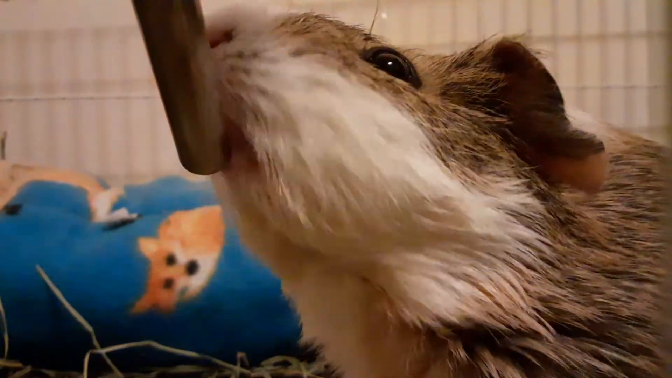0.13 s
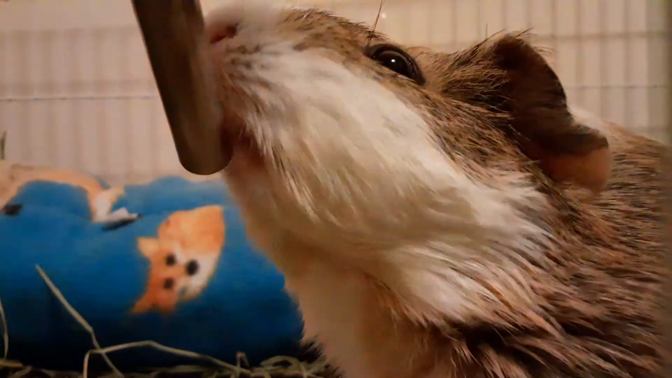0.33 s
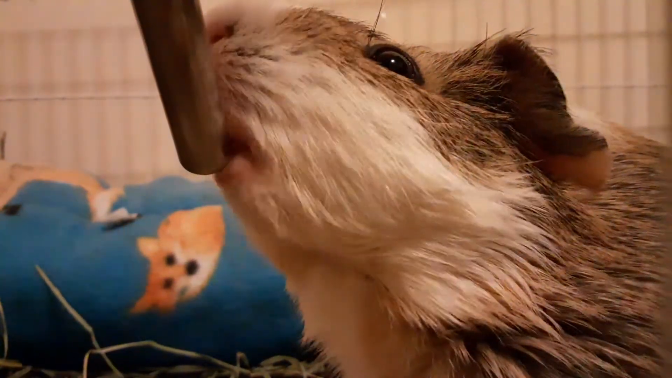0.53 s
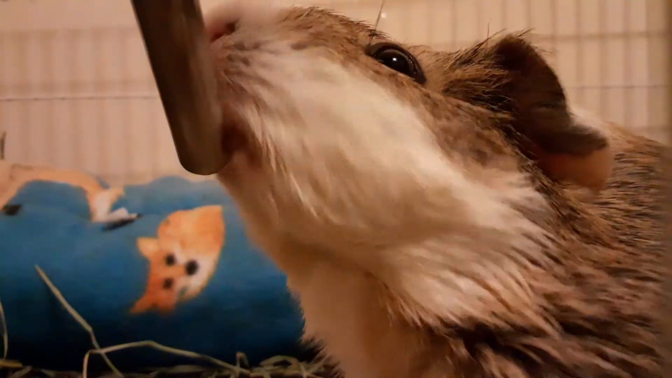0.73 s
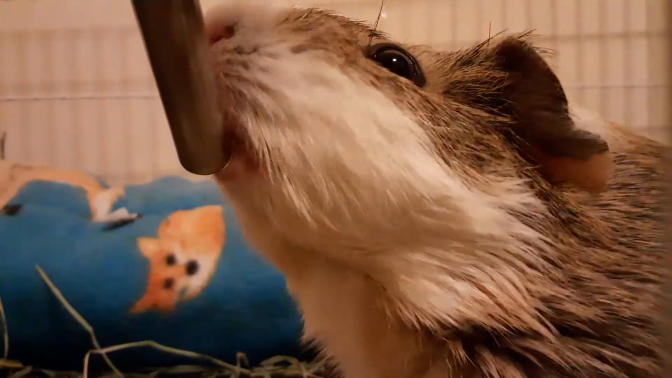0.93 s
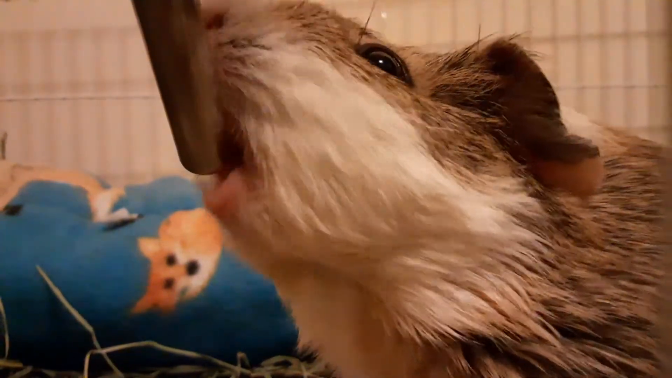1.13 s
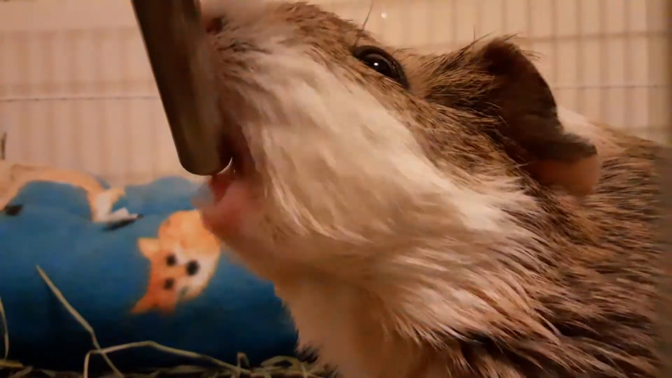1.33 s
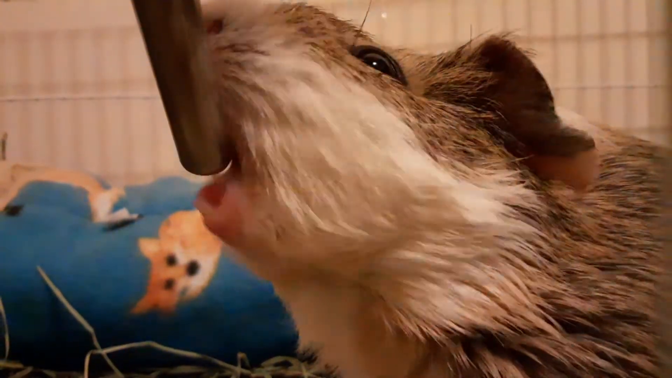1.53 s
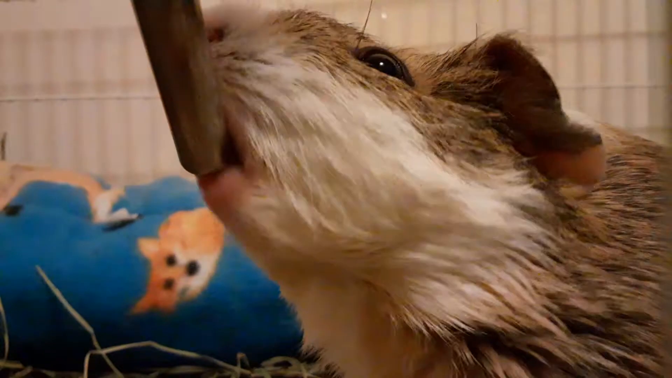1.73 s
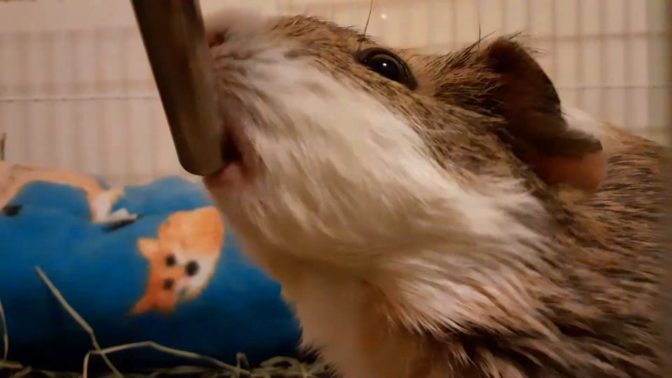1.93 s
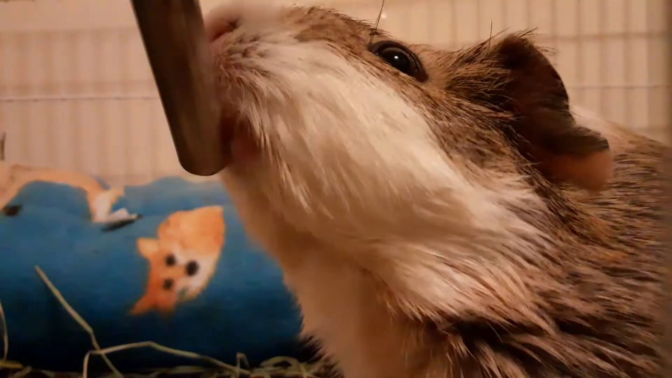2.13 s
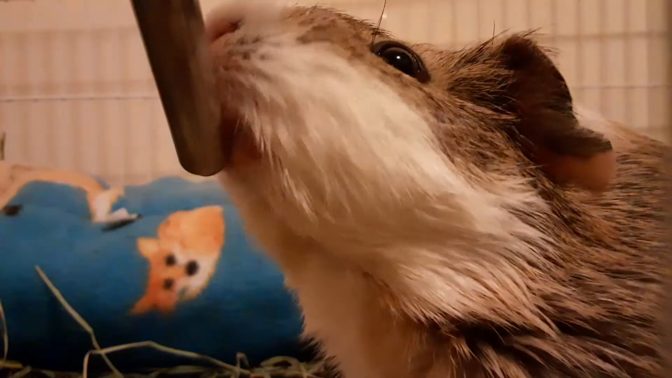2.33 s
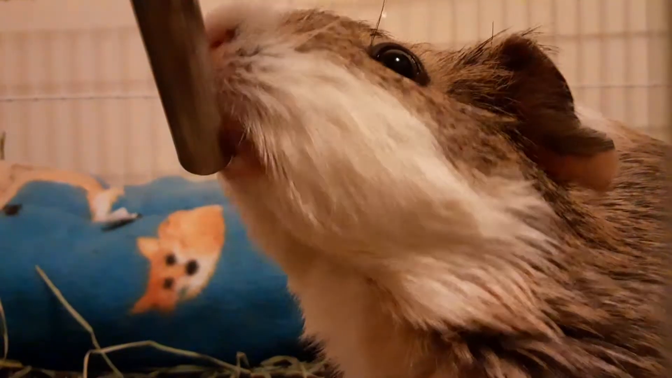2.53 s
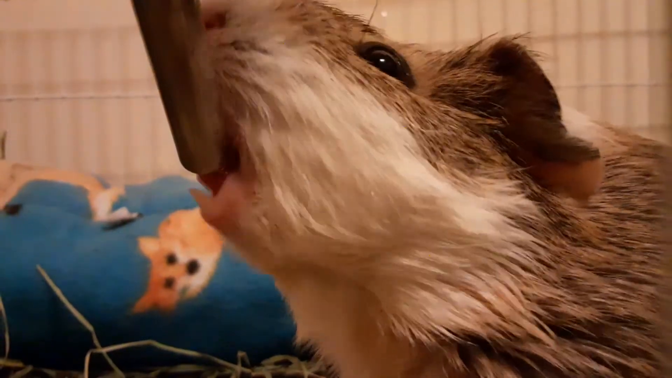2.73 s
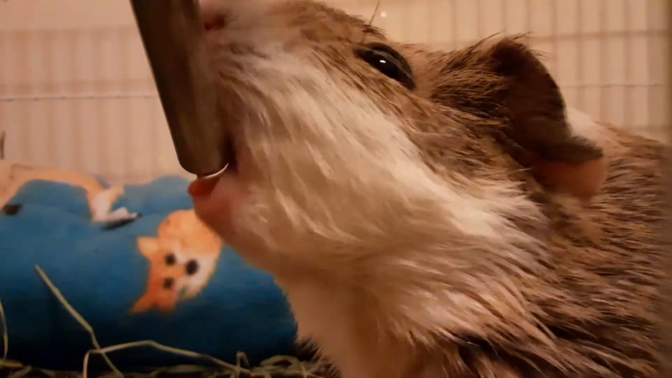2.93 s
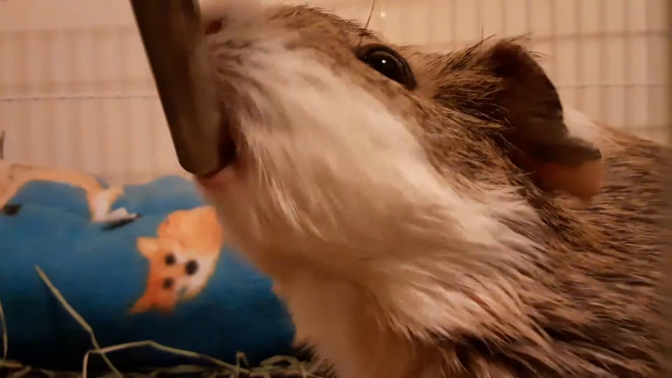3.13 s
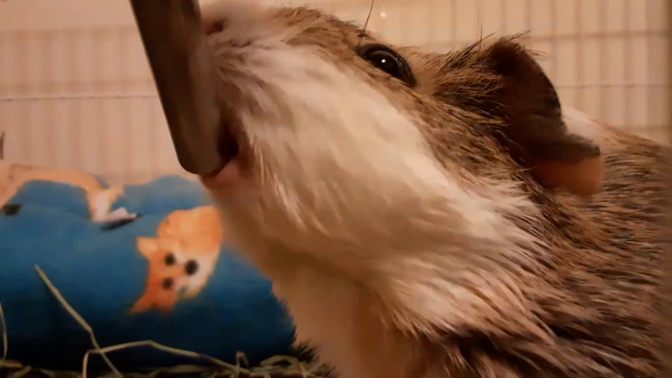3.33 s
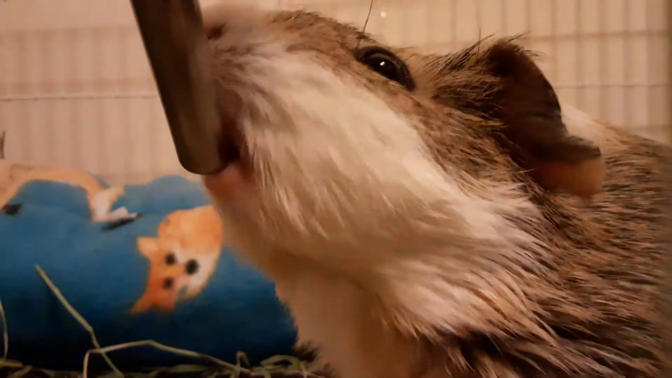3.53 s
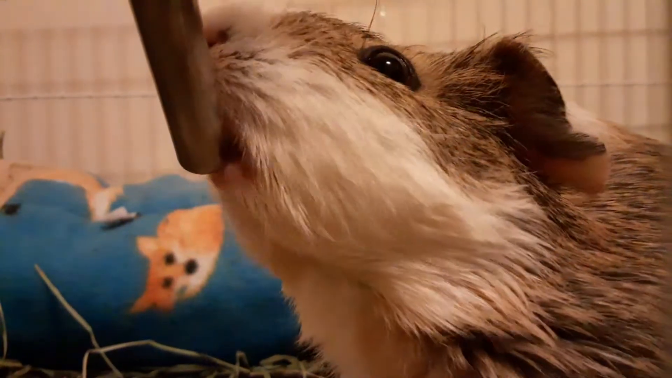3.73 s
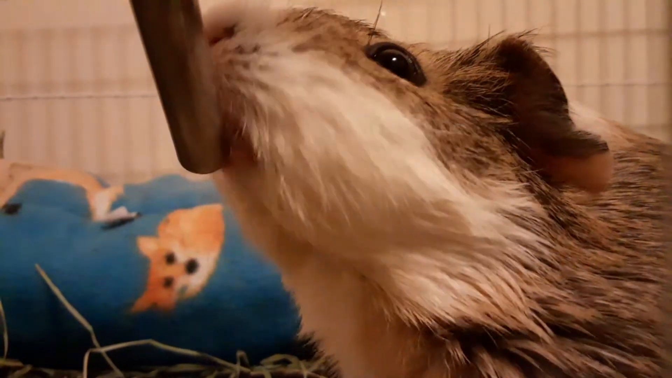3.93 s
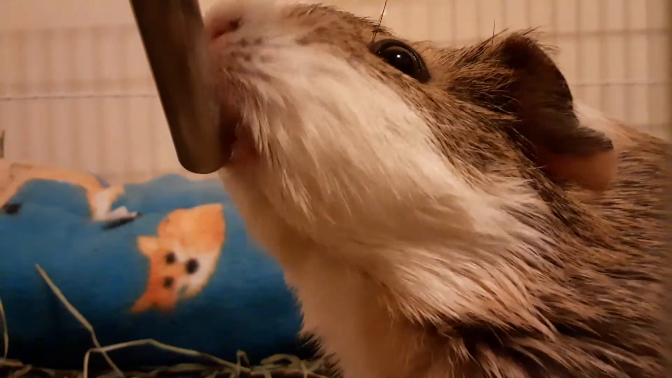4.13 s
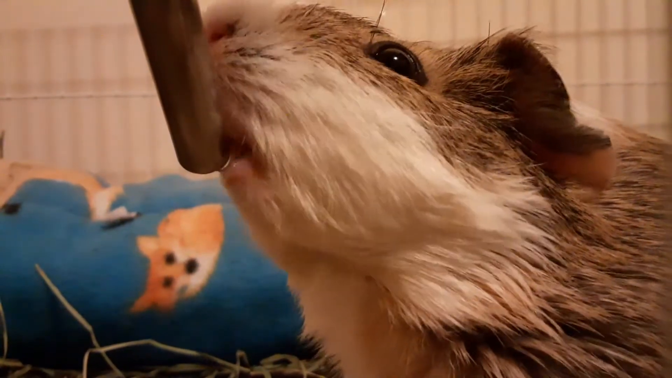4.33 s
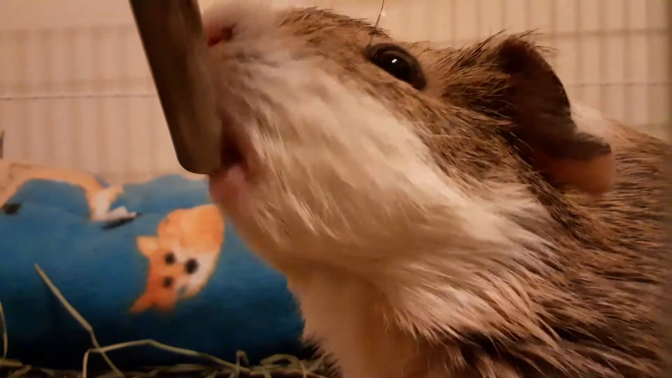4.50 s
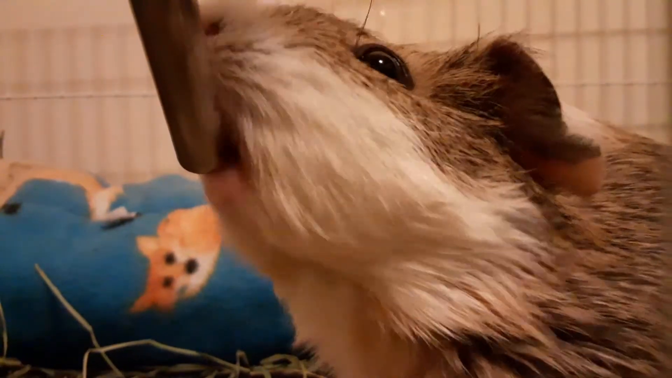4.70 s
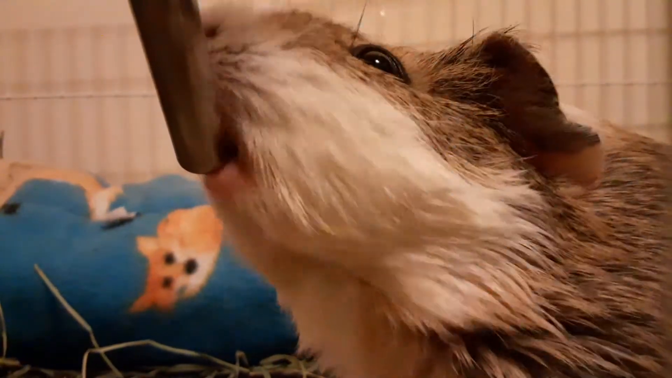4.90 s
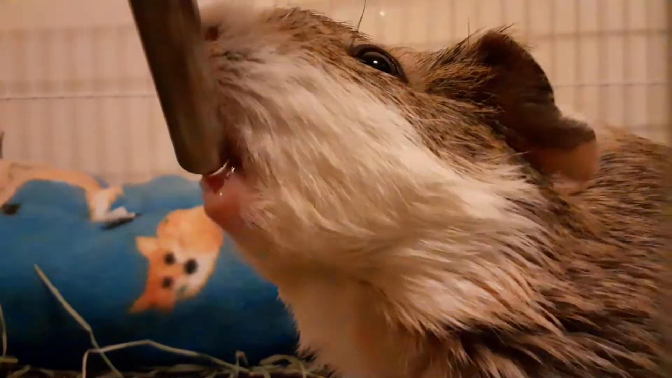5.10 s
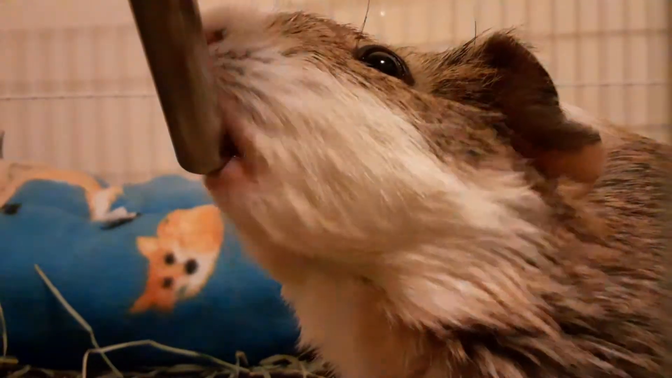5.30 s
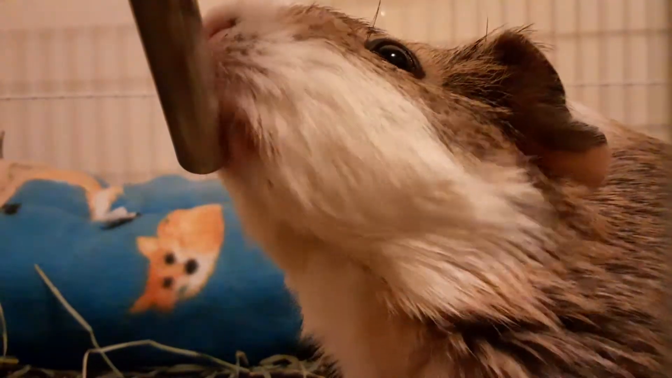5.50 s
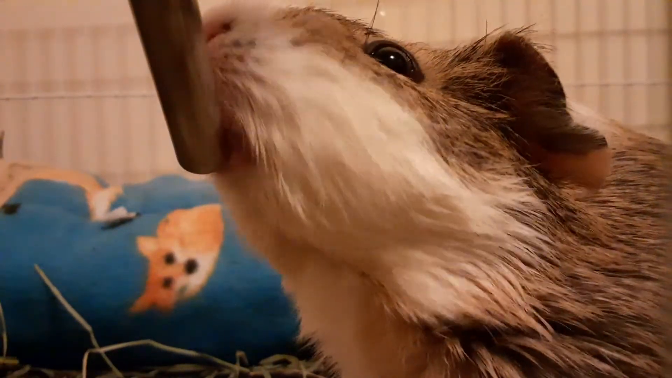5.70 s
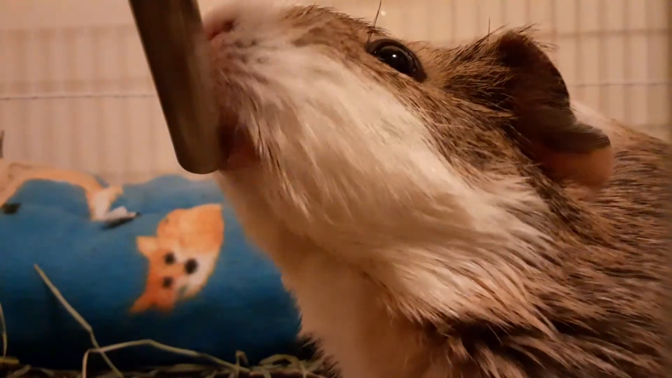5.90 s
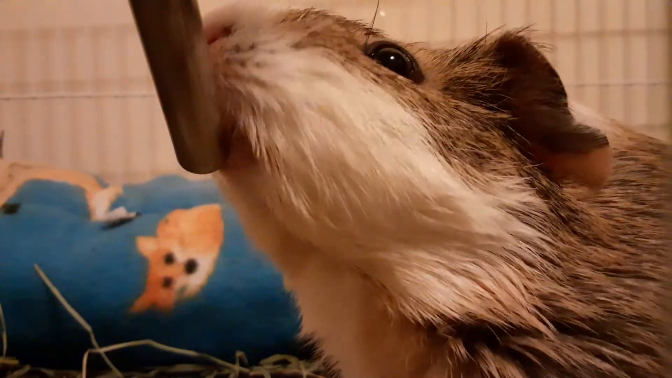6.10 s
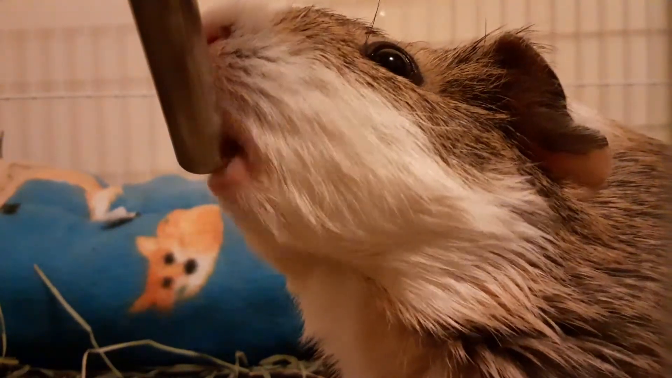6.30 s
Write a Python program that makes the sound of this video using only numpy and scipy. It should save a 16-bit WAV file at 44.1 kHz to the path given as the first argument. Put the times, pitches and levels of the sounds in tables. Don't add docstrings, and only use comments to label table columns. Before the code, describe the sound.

Bright, hard ticks and knocks of a ball in a steel water spout as a small animal licks it, with pauses of quiet hiss.

```python
import sys
import numpy as np
from scipy import signal
from scipy.fft import rfft, irfft, next_fast_len
from scipy.io import wavfile
from scipy.ndimage import uniform_filter1d

SR = 44100
rng = np.random.default_rng(int(sys.argv[2]) if len(sys.argv) > 2 else 0)


def how_loud(loudness_db):
    steps = np.asarray(loudness_db, float) / 20
    return 10 ** steps


def inscribe(sig):
    pcm = np.round(np.clip(np.atleast_2d(sig).T, -1, 1) * 32767)
    wavfile.write(sys.argv[1], SR, pcm.astype(np.int16))


N = 280035
SPAN = 4096
LEAD = .001
HISS_TOP_HZ = 15760


def unit(x):
    return x / np.sqrt(np.mean(x ** 2, axis=-1, keepdims=True) + 1e-20)


def along(points, hz):
    f, v = np.transpose(points)
    return np.interp(np.log(hz + 1), np.log(f + 1), v)


def filtered(x, response):
    m = next_fast_len(x.shape[-1] + 8192)
    hz = np.fft.rfftfreq(m, 1 / SR)
    return irfft(rfft(x, m) * response(hz), m)[..., :x.shape[-1]]


def rush(spectrum, patchy_db):
    # hz, correlation
    likeness = [(60, 0.85), (240, 0.7), (950, -0.12), (3770, -0.033), (15000, 0.011)]
    z = signal.stft(rng.standard_normal((2, N)), nperseg=1024)[2]
    field = uniform_filter1d(rng.standard_normal(z.shape[1:]), size=4, axis=0)
    field = uniform_filter1d(field, size=8, axis=1)
    pair = signal.istft(z * how_loud(patchy_db * field / field.std()), nperseg=1024)[1][:, :N]

    def mid_side(hz):
        angle = np.arccos(np.clip(along(likeness, hz), -1, 1)) / 2
        return how_loud(along(spectrum, hz)) * [np.cos(angle), np.sin(angle)]

    mid, side = filtered(pair, mid_side)
    return unit(np.array([mid + side, mid - side]))


def background():
    # hz, density_db
    hum_spectrum = [(15, -60), (25, -38), (50, -14.5), (100, -7.5), (250, -7.5), (340, 0.5), (400, -7.5),
                    (450, -6), (600, -12), (880, -12), (1130, -19.5), (1450, -12), (2600, -17.5),
                    (4000, -29), (5200, -66)]
    # hz, density_db
    hiss_spectrum = [(1760, -32.5), (3000, -25), (4050, -4), (5500, -11.5), (7000, -18.5), (8500, -20),
                     (9900, -19.5), (11600, -7), (12200, -4.5), (13200, -10), (14500, -3), (15500, -1),
                     (16000, 0.5)]
    # time_s, hum_db, hiss_db
    floor_levels = [(0.0, -46.5, -50), (1.09, -46.5, -51), (1.27, -46.5, -49), (6.35, -45.5, -49.5)]
    # time_s, level_db
    brush = [
        (3.78, -84),
        (3.85, -66),
        (3.92, -56),
        (3.96, -62),
        (4.05, -74),
    ]
    fur_spectrum = [(5000, -27), (9000, -15.0), (13000, -6), (16000, -16.5)]  # hz, level_db
    t = np.arange(N) / SR
    s, hum_db, hiss_db = np.transpose(floor_levels)
    hum = how_loud(np.interp(t, s, hum_db) - 6.0) * rush(hum_spectrum, patchy_db=2.0)
    hiss = how_loud(np.interp(t, s, hiss_db) - 8.5) * rush(hiss_spectrum, patchy_db=-0.3)
    grain_db = 2.7 * rng.standard_normal(N // 64 + 1).repeat(64)[:N]
    grains = rng.standard_normal((2, N)) * how_loud(grain_db)
    fur = unit(filtered(grains, lambda hz: how_loud(along(fur_spectrum, hz))))
    brush_db = np.interp(t, *np.transpose(brush), left=-120, right=-120)
    return hum + hiss + how_loud(brush_db) * fur


def contacts():
    # time_s, tick_db, knock_db, ring_db, left_minus_right_db
    snaps = [
        (.302, -57, -69, -75, 3),
        (1.985, -62, -45, -81, 4),
        (2.309, -51, -66, -71, 3),
        (2.445, -43.5, -63, -69, 3),
        (2.529, -53, -66, -75, 3),
        (2.737, -46, -57, -71, 3),
        (4.152, -53, -69, -75, 1),
        (4.2215, -58, -57, -74, -3),
        (4.489, -50.5, -67, -80, 2),
        (6.021, -46, -62, -70, 12),
    ]
    # time_s, tick_db, touch_earlier_s, touch_db
    throws = [(1.1646, -6, 0.0085, -27), (1.3878, -6, .0118, -27), (1.5979, -6.5, 0.0089, -29),
              (1.8353, -8, 0.0065, -25), (2.801, -6, 0.0079, -25), (3.0601, -5.5, 0.0065, -24),
              (3.2813, -6.5, 0.0093, -27), (3.5084, -5, 0.006, -22), (3.7061, -12, 0.016, -34),
              (4.6939, -7.5, 0.0074, -31), (4.8903, -4.5, 0.0078, -19), (5.16, -7, 0.0061, -23)]
    # time_s, tick_db, rebound_after_s, rebound_db
    returns = [
        (1.196, -8, .0439, -25),
        (1.6255, -17, .0285, -35),
        (1.4218, -12, .0098, -17),
        (1.8642, -14, .0162, -23),
        (2.8326, -12, .0126, -22),
        (3.3108, -12, .0176, -19),
        (3.5461, -15, .0102, -23),
        (4.7242, -10, .0065, -26),
        (4.9189, -12, .0115, -27),
        (5.197, -12, .0115, -21),
    ]
    # time_s, knock_db, bounce_after_s, bounce_db
    drops = [
        (.028, -30.5, 0.0052, -33.5),
        (1.2729, -16, 0.0058, -15),
        (1.4875, -16.5, 0.0063, -19.5),
        (1.716, -14.5, .0089, -20),
        (2.9063, -13.5, 0.0064, -17),
        (3.1738, -16, 0.006, -20),
        (3.3936, -13, 0.0063, -19.5),
        (3.6264, -19.5, 0.008, -19),
        (4.7893, -13.5, 0.0068, -14.5),
    ]
    # time_s, knock_db
    settles = [(1.5015, -22), (2.9205, -28), (3.188, -24.5), (3.4096, -27), (3.414, -37), (3.7287, -29),
               (3.7356, -30), (3.7425, -28.5), (3.7671, -34), (5.0043, -31), (5.0253, -24.5)]
    # time_s, tick_db, ring_db
    rattles = [(.0049, -13.5, -37), (0.1177, -27, -58), (1.17, -38, -52), (1.1785, -17, -55),
               (1.184, -31, -39), (1.1897, -24, -47), (1.3994, -13, -42), (1.4023, -39, -60),
               (1.6144, -21, -27), (1.6732, -18.5, -51), (1.84, -24, -31), (1.8467, -35, -43),
               (1.8508, -25, -47), (2.8165, -9, -44), (3.0397, -24, -46), (3.0716, -42, -33),
               (3.119, -26, -52), (3.299, -13.5, -32), (3.5838, -20.5, -39), (3.7119, -17, -30.5),
               (3.7259, -28, -38), (4.6722, -27, -47.5), (4.704, -17, -41), (4.735, -31.5, -51),
               (4.8298, -30, -52), (4.9042, -21, -30), (4.9831, -21.5, -52), (5.173, -16, -44),
               (5.2274, -26, -45), (5.3618, -25.5, -54)]
    # time_s, tick_db
    grazes = [(1.1005, -44.5), (1.1487, -34), (1.2593, -40), (1.4427, -49), (1.451, -51), (1.4683, -31),
              (1.484, -41), (1.6632, -27), (1.681, -29.5), (1.895, -35.5), (2.28, -52), (2.788, -38),
              (2.8716, -35), (2.886, -33), (3.0762, -26), (3.129, -33.5), (3.3449, -32), (3.359, -36),
              (3.5298, -45), (3.9015, -47), (3.9165, -46), (3.9228, -45.5), (4.6137, -42), (4.7476, -38),
              (4.8748, -36), (4.8972, -43), (4.959, -30.5), (4.9793, -33.5), (6.0262, -54)]
    # time_s, knock_db, tick_db
    nudges = [(0.0916, -41, -47), (0.1154, -30, -41.5), (0.4382, -40, -67), (.4401, -46.5, -54),
              (1.1447, -39, -35), (1.3067, -34, -46), (1.3156, -36, -44), (1.3722, -37, -40),
              (1.6667, -41, -40), (1.746, -39, -45), (1.9232, -33, -35), (2.3403, -43, -55),
              (2.0053, -33, -29), (2.785, -36, -36), (2.93, -33, -45), (2.9464, -36, -47),
              (3.035, -38, -39), (3.0891, -35, -35), (3.094, -37, -27), (3.4283, -36, -48),
              (3.6546, -33, -58), (3.662, -41, -47), (3.7577, -28.5, -38), (4.2276, -46, -48),
              (4.669, -39, -36), (4.9415, -40, -46), (5.0163, -46, -53), (5.2796, -34, -37),
              (5.336, -39.5, -49), (5.358, -30.5, -45)]
    # tick, knock and ring in dB over the strength, left minus right in dB
    throw, touch = (-1, -14.5, -28, 10), (0.5, -7.5, -21, 8)
    fall, rebound = (0, -9, -17, 7), (-0.5, -10, -16, 15)
    drop, bounce = (3.5, 0, -21, 4), (4.5, 0, -12, 6)
    settle, graze = (2.5, 0.5, -13.5, 2.5), (3, -7, -14, 3)

    def struck(s, db, kind):
        return (s, db + kind[0], db + kind[1], db + kind[2], kind[3])

    rows = list(snaps)
    for table, first, second, order in ((throws, throw, touch, -1), (returns, fall, rebound, 1),
                                        (drops, drop, bounce, 1)):
        rows += [struck(s, db, first) for s, db, _, _ in table]
        rows += [struck(s + order * gap, db, second) for s, _, gap, db in table]
    rows += [struck(s, db, settle) for s, db in settles]
    rows += [struck(s, db, graze) for s, db in grazes]
    rows += [(s, db, -25.5 + 0.36 * db, ring_db, 5.5) for s, db, ring_db in rattles]
    rows += [(s, tick_db, db, db - 20, 3.5) for s, db, tick_db in nudges]
    return rows


def contact(noise, blow, t60, late_db, late_t60):
    t = np.arange(SPAN) / SR - LEAD
    after = how_loud(-60 * t / t60) + how_loud(late_db - 60 * t / late_t60)
    force = noise * np.where(t < 0, how_loud(-5.5 + 97000 * t), after)
    force[:, round(LEAD * SR)] = -blow
    return force * (t < SPAN / SR / 2)


def resonant(x, modes, luck_db, detune):
    f, response = np.fft.rfftfreq(SPAN, 1 / SR), 0
    for k, (hz, width, db) in enumerate(modes):
        center = hz * (1 + detune[:, [k]])
        strength = (-1) ** k * how_loud(db + luck_db[:, [k]])
        damping = 1j * f * width
        response = response + strength * damping / (center * center - f * f + damping)
    y = irfft(rfft(x) * response, SPAN)
    return y / np.abs(y).max(axis=1, keepdims=True)


def place(rows, seconds):
    at = np.round(seconds * SR).astype(int)[:, None] + np.arange(SPAN)
    return np.bincount(at.ravel(), rows.ravel(), N + SPAN)[:N]


def ball():
    # mode_hz, width_hz, level_db
    steel_modes = [(6520, 240, -5), (9000, 990, -5), (12680, 1030, 1.5), (14470, 890, 5.5),
                   (15230, 510, -8)]
    # mode_hz, width_hz, level_db
    bottle_modes = [(1010, 56, -10.5), (1411, 137, 5), (1670, 277, 2.5), (2204, 960, -0.5), (2690, 185, 2),
                    (2940, 384, -6.5), (3917, 640, -0.5), (3977, 800, -3.5), (5480, 2100, -7),
                    (6400, 284, -3.5), (6300, 910, -19)]
    # mode_hz, width_hz, level_db
    tube_modes = [(10104, 180, 0), (10230, 450, -1.5)]
    # mode_hz, width_hz, level_db
    cage_modes = [(62.4, 25, -5.5), (146, 62, -2.5), (256, 57, -1), (362, 24.2, 5), (528, 540, -11.5)]
    # hz, gain_db
    shadow = [(100, -0.5), (300, 3), (450, 4.5), (800, -7), (2000, -5), (4500, -1.5), (8000, -12),
              (10400, -0.5), (12300, -7.5), (14500, -3)]
    s, tick_db, knock_db, ring_db, pan_db = np.transpose(contacts())
    count, modes = len(s), len(bottle_modes)
    grain = how_loud(6.97 * rng.standard_normal((count, SPAN // 8)).repeat(8, axis=1))
    near, other = grain * rng.standard_normal((2, count, SPAN))
    luck_db = 1.5 * rng.standard_normal((4, count, modes))
    detune = .022 * rng.standard_normal((count, modes))
    drop = np.clip((knock_db - tick_db + 18.5) / 16, 0, 1)[:, None]
    boom_db = 0.61 * knock_db + 0.5 * tick_db - 16.5
    push, start = np.zeros(SPAN), round(LEAD * SR)
    push[start - 5:][:14] = -np.hanning(14)
    push[start + 8:][:60] += .15 * np.hanning(60)
    hard = 14
    far_noise = 0.73 * near + 3.1 * other
    ports = []
    for lag, loss_db, smear, noise in ((0, 0 * pan_db, 0.46, near), (.00025, pan_db, 1.4, far_noise)):
        force = contact(noise, hard, 0.014 * smear, -34, 0.028)
        tick = how_loud(tick_db + 5.0)[:, None] * resonant(force, steel_modes, luck_db[0], detune)
        force = contact(noise, 2 * hard, (0.038 + 0.028 * drop) * smear, -20 + 12 * drop, 0.086)
        knock = how_loud(knock_db + 5.0)[:, None] * resonant(force, bottle_modes, luck_db[1], detune)
        force = contact(noise, hard, 0.016, -40, 0.037)
        ring = how_loud(ring_db + 12)[:, None] * resonant(force, tube_modes, luck_db[2], detune / 8)
        force = contact(near, hard, 0.053, -6, 0.18)
        boom = how_loud(boom_db)[:, None] * resonant(force, cage_modes, luck_db[3], detune)
        dip = how_loud(boom_db + 15 - 20 * (lag > 0))[:, None] * push
        rows = how_loud(-loss_db)[:, None] * (tick + knock + ring + boom + dip)
        ports.append(place(rows, s + lag + .00225))
    far = filtered(ports[1], lambda hz: how_loud(along(shadow, hz)))
    return np.roll([ports[0], far], -round((LEAD + .002) * SR), axis=1)


def room(x):
    # hz, t60_s
    decay = [(200, 1), (1000, 0.18), (3000, 0.31), (7000, 0.16), (15000, 0.11)]
    out, step = np.zeros((2, N + SR)), SR // 10
    delay = 130
    for start in range(0, N, step):
        hz, t, z = signal.stft(rng.standard_normal((2, SR // 4)), SR, nperseg=256)
        fading = z * how_loud(-60 * t / along(decay, hz)[:, None])
        tail = signal.istft(fading, SR, nperseg=256)[1]
        wet = signal.fftconvolve(x[None, start:start + step], tail / np.linalg.norm(tail[0]), axes=1)
        out[:, start + delay:start + delay + wet.shape[1]] += wet
    return out[:, :N]


def bumps():
    # start_s, level_db, pitch_hz, t60_s
    soft = [
        (2.352, -44, 3550, .03),
        (.845, -55, 897, 0.48),
        (3.64, -38, 130, 0.088),
        (3.739, -44, 227, 0.5),
        (3.946, -33, 115, 0.063),
        (4.443, -39, 273, 0.096),
        (6.026, -41.5, 336, 0.1),
    ]
    s, db, hz, t60 = np.transpose(soft)[:, :, None]
    t = np.arange(SPAN) / SR
    tone = how_loud(db - 60 * t / t60) * np.sin(2 * np.pi * hz * t)
    onset = 1 - np.exp(-t / 0.004)
    fade = np.cos(np.pi / 2 * t * SR / SPAN)
    return place(tone * onset * fade, s[:, 0])


def scene():
    def below_top(hz):
        return hz < HISS_TOP_HZ

    spout = ball()
    quiet = bumps() + background() * how_loud([[.1], [-.1]])
    echo = how_loud(-15.0) * room(spout[0])
    return spout + filtered(echo, below_top) + filtered(quiet, below_top)


def low_pass(x):
    return signal.sosfilt(signal.butter(12, 16980, fs=SR, output="sos"), x)


def record(dry):
    # hz, gain_db
    front = [(20, -5), (70, -3), (15300, -1), (16000, -2), (16600, -17), (17000, -46), (17600, -90)]
    mix = filtered(dry, lambda hz: how_loud(along(front, hz)))
    return low_pass(mix)


dry = scene()
out = record(dry)
inscribe(out)
```